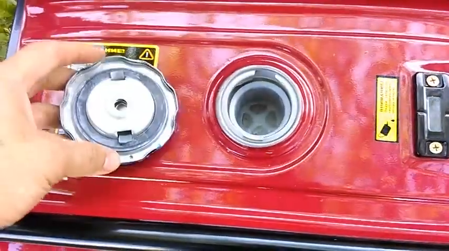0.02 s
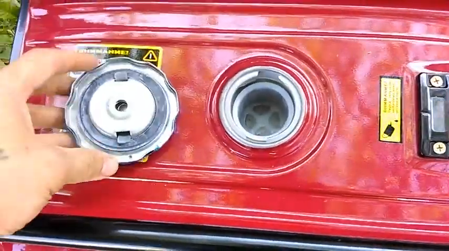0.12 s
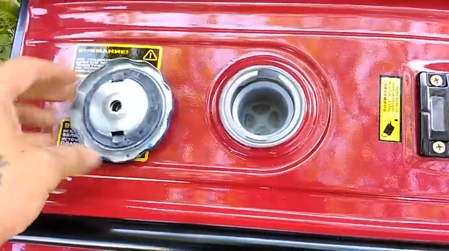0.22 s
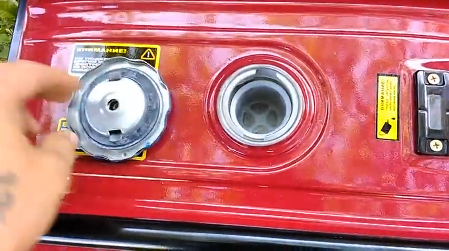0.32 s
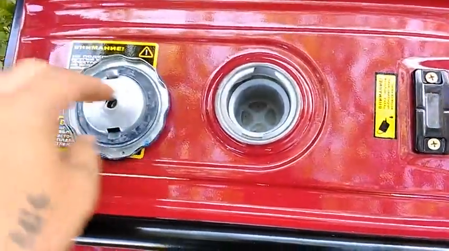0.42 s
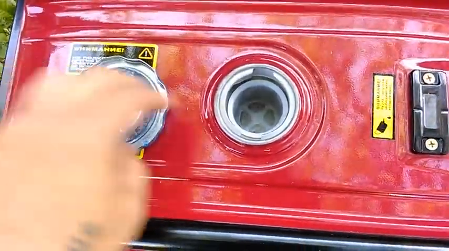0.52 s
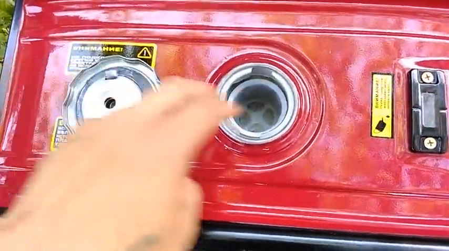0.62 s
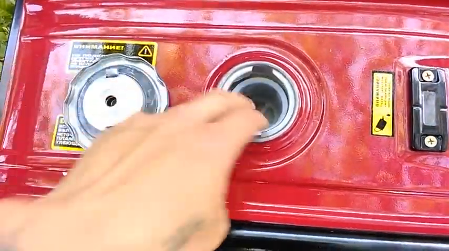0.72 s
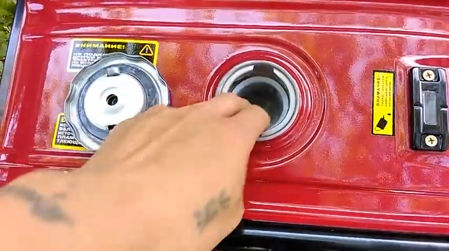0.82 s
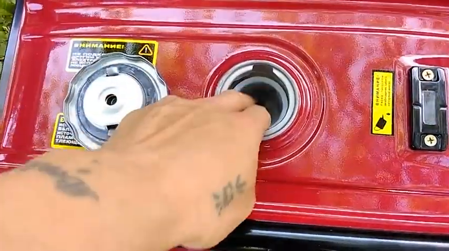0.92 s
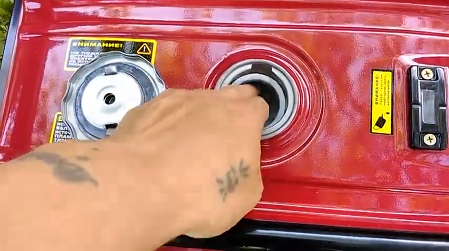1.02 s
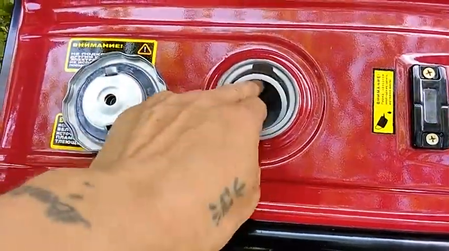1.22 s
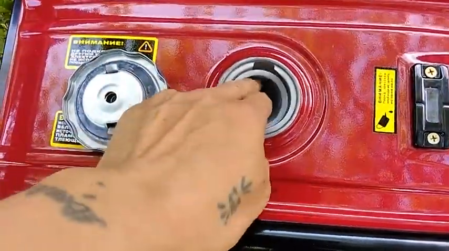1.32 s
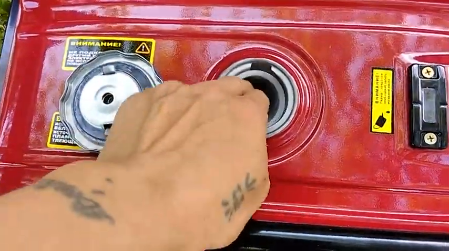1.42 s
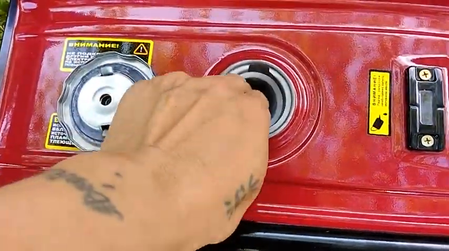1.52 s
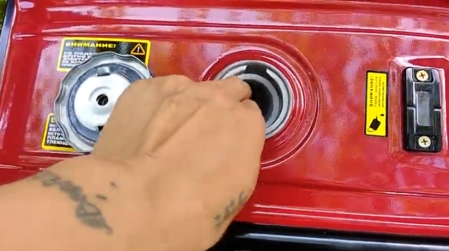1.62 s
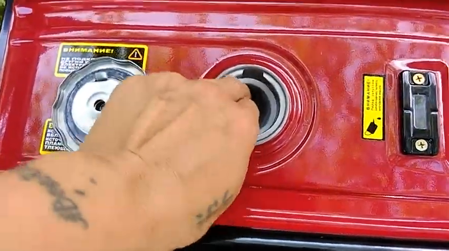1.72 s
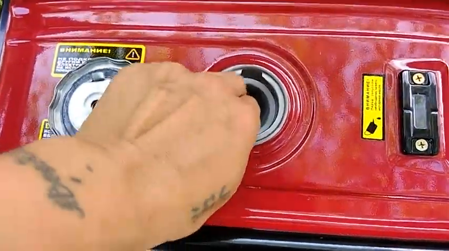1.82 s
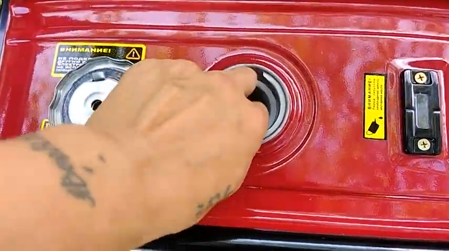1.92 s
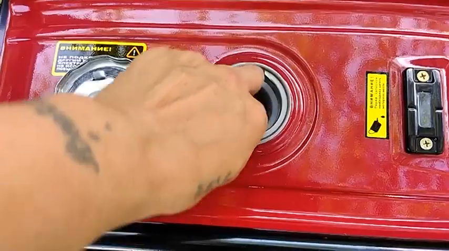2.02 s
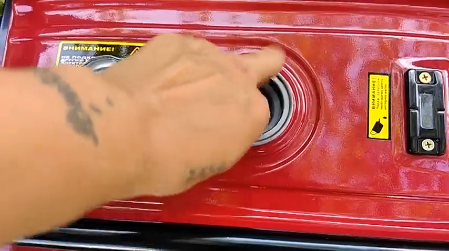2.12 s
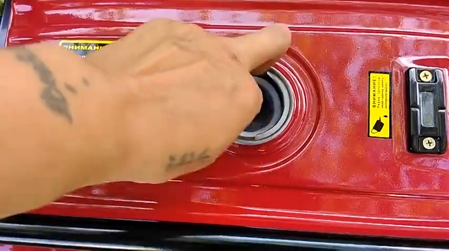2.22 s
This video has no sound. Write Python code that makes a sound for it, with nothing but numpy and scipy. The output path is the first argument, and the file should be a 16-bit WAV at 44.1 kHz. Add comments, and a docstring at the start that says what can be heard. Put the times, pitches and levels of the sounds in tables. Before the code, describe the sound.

A fuel cap is set down on a hollow steel generator tank: a loud clank at 0.24 s, rattling knocks until about 0.6 s, the ring fading into a low boom. After a lull, fingers rub and knock softly at the neck and plastic strainer from 0.9 to 1.4 s, sparsely near 1.65 s, then more thumps from 1.9 s with a faint dull squeak around 2 s. Close, quiet outdoor air.

```python
"""Outdoors, close by a generator: its fuel cap is set down on the hollow steel tank, clanks and rocks to rest.
Fingers knock on the tank, the filler neck and the plastic strainer, and the tank gives a short hollow ring.
Each blow is a set of decaying sine modes over a dense noise ring; hard edges add dry ticks.
Skin slides over the paint as bands of grainy noise, a fingertip squeaks as a wavering sine,
and still air is steady coloured noise. A recorder's low cut, noise suppressor and band limit follow."""
import sys
import numpy as np
from scipy import signal
from scipy.fft import rfft, irfft
from scipy.io import wavfile
from scipy.ndimage import uniform_filter1d

SR = 44100
rng = np.random.default_rng(int(sys.argv[2]) if len(sys.argv) > 2 else 0)


def put_to_file(sound):
    """Save the sound as 16-bit audio at rate SR, in the file named by the first command-line argument."""
    columns = np.atleast_2d(sound).T  # one column per channel
    safe = np.clip(columns, -1, 1)
    whole_steps = np.round(safe * 32767)
    wavfile.write(sys.argv[1], SR, whole_steps.astype(np.int16))


N = 99225

# Centres of the six registers of a blow, boom to tick: pitch_hz
REGISTER_HZ = [70, 150, 280, 650, 1500, 6500]
# The cap meets the tank: start_s, boom_db, thump_db, body_db, ring_db, clank_db, tick_db
CAP_KNOCKS = [ (.1600, -76.5, -72.5, -65, -83, -79.5, -93), (.2370, -53, -37, -35.5, -61, -67, -70),
              (.2432, -51.5, -48, -27.5, -33.5, -36, -48.5), (.2474, -35.5, -36, -36, -49.5, -44.5, -46.5),
              (.3010, -39.5, -43.5, -45, -36, -46, -57), (.3530, -64, -46, -37.5, -56, -52.5, -59.5),
              (.3690, -43.5, -55.5, -61, -52, -85, -62), (.3930, -46, -84, -53, -40, -49.5, -65),
              (.4210, -53, -41.5, -44, -74.5, -50, -64.5), (.4650, -57.5, -51.5, -70, -65, -97, -77),
              (.5450, -57, -60.5, -48.5, -78, -88, -97), (.6000, -53.5, -63, -58.5, -103, -68, -100)]
# Fingers on tank, neck and strainer: start_s, boom_db, thump_db, body_db, ring_db, clank_db, tick_db
FINGER_KNOCKS = [ (-.004, -52.5, -52, -53.5, -45.5, -49.5, -59), (.907, -99, -77, -57.5, -58, -65.5, -80),
                 (1.033, -60, -52, -51, -56.5, -63, -64), (1.098, -83, -48.5, -80, -47.5, -58, -56.5),
                 (1.106, -60, -46.5, -45, -47.5, -57.5, -58), (1.138, -65, -49.5, -50, -59, -66, -58),
                 (1.195, -51, -81, -52.5, -59, -61, -78), (1.224, -62, -58, -69, -64, -71, -92),
                 (1.345, -75, -54.5, -55.5, -49, -58.5, -63), (1.370, -68, -64, -40.5, -86, -89, -72),
                 (1.388, -69, -62, -48.5, -87, -52.5, -59.5), (1.395, -68.5, -60, -43, -46.5, -56.5, -65.5),
                 (1.632, -62.5, -57, -58, -95, -76, -94), (1.671, -60, -49, -50.5, -57.5, -63.5, -80.5),
                 (1.916, -82.5, -92, -48.5, -61.5, -63, -95), (1.936, -58, -46.5, -51.5, -61.5, -62, -72.5),
                 (1.965, -42, -43, -49, -59, -59.5, -54), (1.994, -51, -45.5, -91, -61.5, -62, -63),
                 (2.013, -54, -49, -61, -87, -68, -72), (2.0875, -74, -43.5, -63, -83, -77, -97),
                 (2.171, -56.5, -44.5, -63.5, -67.5, -68, -63)]
# Modes of the cap lying on the top panel, level relative to the blow: pitch_hz, level_db, t60_s
CAP_MODES = [(68.5, -1, 0.54), (121.9, 1, 0.36), (152.6, -6.5, 0.72), (217.1, -8.5, 0.56),
             (261.1, -1, 0.46), (313.4, -12.5, 1), (362.5, -19, 0.35), (614.5, -6, 0.28), (708, -17, 0.59),
             (987, -20, 0.16), (1037, -8, 0.33), (1217, -8.5, 0.13), (1405, -15, 0.82), (1686, -8.5, 0.19),
             (2950, -8, 0.37), (3744, -12, 0.25)]
# Modes of the tank struck at its neck, level relative to the blow: pitch_hz, level_db, t60_s
TANK_MODES = [(67.6, -4.5, 0.43), (152.4, -1, 0.26), (234, -14.5, 0.5), (273.1, -1.5, 0.29),
              (307.4, -6, 0.43), (406, -14, 0.32), (470.4, -11.5, 0.39), (505.6, -7, 0.32),
              (625, -7.5, 0.22), (730.4, -3, 0.38), (759.4, -12, 0.3), (835, -16, 0.67), (872, -13, .3),
              (1285, -7, 0.23), (1367, -10, 0.2)]
# Dense ringing of the sheet steel under the cap, relative to the blow: pitch_hz, density_db_per_hz, t60_s
CAP_WASH = [(41.3, -44, 0.87), (68.5, -14.5, 0.33), (168, -21.5, 0.62), (356.6, -25.5, 0.39),
            (495, -36.5, 0.93), (619, -26, 0.35), (1320, -31, 0.58), (2060, -37.5, 0.61), (3270, -41, 0.39),
            (4850, -42, 0.5), (5750, -35.5, 0.26), (7900, -44, 0.38), (11900, -52, 0.19),
            (15400, -55.5, 0.14)]
# Dense ringing of the sheet steel under the fingers, same columns: pitch_hz, density_db_per_hz, t60_s
TANK_WASH = [(39, -41.5, 0.34), (65.5, -15.5, 0.28), (141, -17.5, 0.24), (292, -27.5, 0.11),
             (360, -47.5, 0.64), (650, -23.5, 0.26), (930, -40, 0.5), (1290, -31.5, 0.33),
             (1740, -34.5, 0.3), (1900, -39, 0.32), (3030, -38.5, 0.23), (5180, -44, 0.32),
             (7200, -39.5, 0.14), (10280, -54, 0.54), (14000, -74, 0.17)]
# Dry ticks and pocks of hard edges, plastic and fingernails: start_s, level_db, pitch_hz
TICKS = [(0.2443, -38.5, 6750), (0.253, -50, 6230), (0.3033, -52, 6140), (.3535, -52, 6600),
         (0.369, -48.5, 6400), (0.393, -54, 4300), (.4265, -71, 6740), (.908, -64, 760), (.97, -59.5, 1290),
         (1.103, -58.5, 4740), (1.3927, -57.5, 5600), (1.3953, -50, 1180), (1.9175, -44.5, 560),
         (2.177, -61.5, 6200), (2.194, -56.5, 5900)]
# Skin sliding over paint and rim: start_s, hold_s, hiss_db, scrape_db, scrape_pitch_hz
RUBS = [ (0.031, 0.1, -75, -69.5, 1800), (0.169, 0.077, -112, -68.5, 1710), (0.805, 0.11, -63.5, -80, 2830),
        (0.938, 0.058, -74, -75, 760), (1.022, 0.036, -65.5, -62, 1460), (1.074, 0.058, -64, -59, 950),
        (1.159, 0.017, -68.5, -61, 1580), (1.353, 0.043, -65.5, -81, 1400), (1.621, 0.018, -80, -85, 1900),
        (1.649, 0.043, -103, -78, 4370), (1.71, 0.025, -109.5, -68, 2970), (1.878, 0.077, -101, -79, 1150),
        (1.955, 0.036, -59.5, -64, 2250), (2.055, 0.22, -76.5, -68.5, 1630), (2.17, 0.051, -71, -70, 795)]
# Colour of the fine skin hiss, relative: pitch_hz, density_db_per_hz
HISS = [(1500, -22), (3600, -14), (5700, -15.5), (6200, -1), (6700, -1), (7300, -1), (8200, -4),
        (9800, -11.5), (11900, -18), (12400, -24.5), (16000, -41)]
# Colour of the duller skin scrape, relative: pitch_hz, density_db_per_hz
SCRAPE = [(200, -23.5), (560, -8.5), (800, 6.5), (1050, 2.5), (1550, 3), (2000, -2), (3000, -4),
          (4500, -12), (6000, -16), (14000, -31)]
# Path of the fingertip's dull squeak on the rim: time_s, pitch_hz, level_db
DRAG = [(1.95, 874, -82), (1.975, 870, -55), (2.015, 840, -62), (2.032, 697, -59), (2.05, 690, -80)]
# Colour of the outdoor air, relative: pitch_hz, density_db_per_hz
AIR = [(20, -24.5), (60, 10), (140, -8.5), (300, -11), (800, -12.5), (2000, -20.5), (5000, -27),
       (6500, -30), (8000, -20.5), (10000, -27), (13000, -38), (16000, -45.5)]
# The recorder's noise suppressor works around and below this threshold: pitch_hz, density_db_per_hz
THRESHOLD = [(60, -106), (150, -100), (300, -101), (700, -102), (1100, -103), (2500, -117), (6000, -125),
             (15000, -135)]

RISE_CYCLES = 0.25  # time constant of the build-up, in cycles of each pitch
FINGER_DETUNE, DETUNE_S = 0.012, 0.04  # spread of the starting detune as a share of pitch; time to settle
CAP_CRACK_DB, FINGER_CRACK_DB = 11.5, 1  # treble burst of the contact itself, approached in the high bands
CRACK_S, CRACK_HZ = 0.0075, 2500  # decay of the crack, and where half its extra gain is reached
RIPPLE_DB, RIPPLE_HZ = 3, 30  # clusters of modes make the steel's response uneven
FADE_START_S, FADE_HZ, FADE_S = 0.6, 205, 0.09  # from this moment the ring above this pitch fades faster
TICK_OCTAVES, TICK_S, TICK_CYCLES = 0.26, 0.0049, 1.3  # low pocks last longer by some of their cycles
RUB_ATTACK_S, RUB_RELEASE_S = 0.018, 0.043
RUB_GRAIN_DB, GRAIN_S = 1, 0.0077  # unevenness of the slide, and its smoothing time
HISS_RIPPLE_DB, HISS_RIPPLE_HZ = 3.5, 70  # unevenness of each stroke's colour
FOCUS_DB, FOCUS_OCTAVES = 6, 0.25  # lift around the scrape's pitch
DRAG_JITTER = 0.0492  # rms share of pitch
AIR_DB = -74.5
LOW_CUT_HZ, EDGE_HZ = 42, 15850
SUPPRESS_DB = -6  # approached far below the threshold


def knocks(rows, modes, wash, crack_db, detune=0, size=32768):
    """A series of blows on one part, all ringing the same clusters of modes."""
    out, t = np.zeros(N), np.arange(size) / SR
    clusters = ripple(size, RIPPLE_DB, RIPPLE_HZ)
    for start_s, *strength_db in rows:
        add(out, start_s, knock(t, strength_db, modes, wash, clusters, crack_db, detune))
    return out


def knock(t, strength_db, modes, wash, clusters, crack_db, detune):
    """One blow: clear modes over a dense ring; with detune, each starts slightly sharp or flat and settles."""
    out = dense_ring(t, strength_db, wash, clusters, crack_db)
    settling = DETUNE_S * (1 - np.exp(-t / DETUNE_S))  # integral of the fading detune
    random_detunes = detune * rng.normal(0.31, 1, len(modes))
    for (pitch_hz, level_db, t60_s), start_detune in zip(modes, random_detunes):
        level = np.sqrt(2) * amp(level_db + read(pitch_hz, REGISTER_HZ, strength_db))
        envelope = rise(t, pitch_hz) * np.exp(-np.log(1000) * t / t60_s)
        detuned_time = t + start_detune * settling
        out += level * envelope * np.sin(2 * np.pi * pitch_hz * detuned_time)
    return out


def dense_ring(t, strength_db, wash, clusters, crack_db, count=22):
    """Countless close modes: noise in narrow bands, each with its own decay, under the crack of contact."""
    wash_hz, wash_db, wash_t60_s = np.transpose(wash)
    hz = np.fft.rfftfreq(len(t), 1 / SR)
    colour = clusters * amp(read(hz, wash_hz, wash_db) + read(hz, REGISTER_HZ, strength_db))
    random_phase = np.exp(2j * np.pi * rng.random(len(hz)))
    spectrum = random_phase * colour * np.sqrt(len(t) * SR / 2)  # density per Hz to bin height
    centres = np.geomspace(50, 16000, count)
    out = np.zeros(len(t))
    for centre, share in zip(centres, np.eye(count)):  # overlapping triangular bands
        band = irfft(spectrum * read(hz, centres, share), len(t))
        treble_share = centre / (centre + CRACK_HZ)
        crack = 1 + (amp(crack_db) - 1) * np.exp(-t / CRACK_S) * treble_share
        decay = np.exp(-np.log(1000) * t / read(centre, wash_hz, wash_t60_s))
        out += band * rise(t, centre) * crack * decay
    return out


def rise(t, hz):
    """Low registers swell more slowly than high ones."""
    return 1 - np.exp(-t * hz / RISE_CYCLES)


def fade_ring(cap):
    """From a set moment the cap's ring above a set pitch fades faster; the low boom carries on."""
    t, hz = np.arange(N) / SR, np.fft.rfftfreq(2 * N, 1 / SR)
    boom = irfft(rfft(cap, 2 * N) / (1 + (hz / FADE_HZ) ** 8))[:N]
    fade = np.exp(-np.maximum(t - FADE_START_S, 0) / FADE_S)
    return boom + (cap - boom) * fade


def ticks(size=2048):
    """Tiny hard contacts: noise bursts under an octave wide that die within milliseconds."""
    out, t, hz = np.zeros(N), np.arange(size) / SR, np.fft.rfftfreq(size, 1 / SR)
    for start_s, level_db, pitch_hz in TICKS:
        band = bell(hz, pitch_hz, TICK_OCTAVES)
        burst = unit(irfft(band * np.exp(2j * np.pi * rng.random(len(hz)))))
        decay = np.exp(-t / (TICK_S + TICK_CYCLES / pitch_hz))
        add(out, start_s, amp(level_db) * burst * rise(t, pitch_hz) ** 2 * decay)
    return out


def rubs(size=16384):
    """Sliding skin: a fine hiss and a duller pitched scrape, broken up by tiny slips; each stroke differs."""
    out, t, hz = np.zeros(N), np.arange(size) / SR, np.fft.rfftfreq(size, 1 / SR)
    for start_s, hold_s, hiss_db, scrape_db, pitch_hz in RUBS:
        hiss = noise(HISS, HISS_RIPPLE_DB, size)
        scrape = noise(SCRAPE, HISS_RIPPLE_DB, size)
        focus = amp(FOCUS_DB * bell(hz, pitch_hz, FOCUS_OCTAVES))
        scrape = unit(irfft(rfft(scrape) * focus))
        grain = unit(uniform_filter1d(rng.standard_normal(size), max(1, round(GRAIN_S * SR))))
        slips = unit(amp(RUB_GRAIN_DB * grain))
        stroke = np.minimum(t / RUB_ATTACK_S, 1) * np.exp(-np.maximum(t - hold_s, 0) / RUB_RELEASE_S)
        add(out, start_s, stroke * slips * (amp(hiss_db) * hiss + amp(scrape_db) * scrape))
    return out


def drag():
    """A fingertip drags on the rim: a short sine squeak, roughened by pitch jitter, that sinks in pitch."""
    t, (time_s, pitch_hz, level_db) = np.arange(N) / SR, np.transpose(DRAG)
    jitter = unit(uniform_filter1d(rng.standard_normal(N), size=128))
    pitch = np.interp(t, time_s, pitch_hz) * (1 + DRAG_JITTER * jitter)
    turns = np.cumsum(pitch) / SR
    touching = (t > time_s[0]) * (t < time_s[-1])
    return np.sqrt(2) * amp(np.interp(t, time_s, level_db)) * touching * np.sin(2 * np.pi * turns)


def air():
    """Still outdoor air: steady coloured noise."""
    return amp(AIR_DB) * noise(AIR)


def noise(spectrum, ripple_db=0, size=N):
    """Steady noise of rms 1 with the given colour."""
    hz = np.fft.rfftfreq(size, 1 / SR)
    colour = amp(read(hz, *np.transpose(spectrum))) * ripple(size, ripple_db, HISS_RIPPLE_HZ)
    return unit(irfft(rfft(rng.standard_normal(size)) * colour, size))


def ripple(size, depth_db, width_hz):
    """Random peaks and dips over a spectrum, shallower in the bass, of mean power 1."""
    grid = np.arange(0, SR / 2, 5)
    bumps = unit(uniform_filter1d(rng.standard_normal(len(grid)), max(1, round(width_hz / grid[1]))))
    hz = np.fft.rfftfreq(size, 1 / SR)
    return unit(amp(depth_db * np.interp(hz, grid, bumps) * hz / (hz + 500)))


def bell(hz, pitch_hz, octaves):
    """A bell curve around a pitch; its standard deviation is given in octaves."""
    return np.exp(-.5 * (np.log2((hz + 1) / pitch_hz) / octaves) ** 2)


def amp(db):
    """Decibels to gain."""
    return 10 ** (np.asarray(db) / 20)


def read(hz, points_hz, values):
    """Straight lines on a logarithmic frequency axis."""
    return np.interp(np.log(hz + 1), np.log(np.asarray(points_hz) + 1), values)


def unit(x):
    """Scales to rms 1."""
    return x / np.sqrt(np.mean(x ** 2) + 1e-20)


def add(mix, start_s, sound):
    """Mixes a sound in at a time, which may lie before the start."""
    at = round(start_s * SR)
    sound = sound[max(-at, 0):]
    part = mix[max(at, 0):][:len(sound)]
    part += sound[:len(part)]


def scene():
    """Cap, fingers and still outdoor air."""
    cap = fade_ring(knocks(CAP_KNOCKS, CAP_MODES, CAP_WASH, CAP_CRACK_DB))
    fingers = knocks(FINGER_KNOCKS, TANK_MODES, TANK_WASH, FINGER_CRACK_DB, FINGER_DETUNE)
    return (cap + fingers + ticks() + rubs() + drag() + air())[None]


def suppress(x, size=512):
    """Faint parts of the spectrum are turned down, which shortens the tails."""
    frames = dict(nperseg=size, noverlap=size - size // 4, scaling="psd")
    hz, _, z = signal.stft(x, SR, **frames)
    power = uniform_filter1d(2 * abs(z) ** 2, size=3, axis=-1)  # smoothed over time, then pitch
    power = uniform_filter1d(power, size=3, axis=-2)
    limit = amp(read(hz, *np.transpose(THRESHOLD)))[:, None] ** 2
    z = z * amp(SUPPRESS_DB * limit / (limit + abs(power)))  # half the cut, in dB, at the threshold
    return signal.istft(z, SR, **frames)[1][:, :N]


def record(dry):
    """The recorder's low cut, noise suppressor and band limit."""
    low_cut = signal.butter(N=3, Wn=LOW_CUT_HZ, btype="high", fs=SR, output="sos")
    thin = signal.sosfilt(low_cut, dry)
    lowpass = signal.firwin(511, EDGE_HZ, window=("kaiser", 9), fs=SR)
    return signal.oaconvolve(suppress(thin), lowpass[None], "same")


dry = scene()
out = record(dry)
put_to_file(out)
```